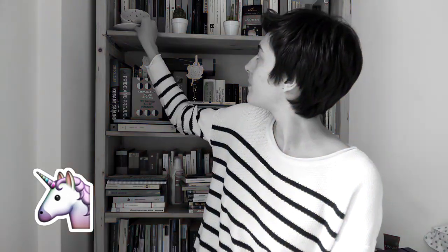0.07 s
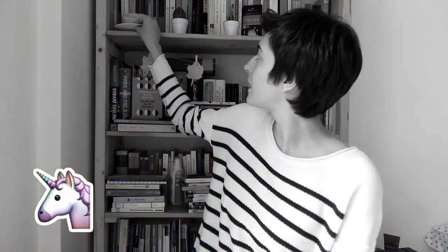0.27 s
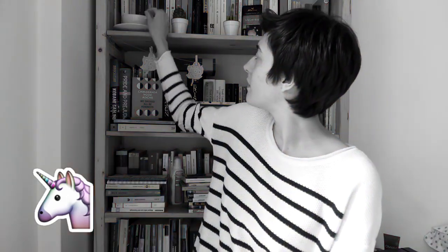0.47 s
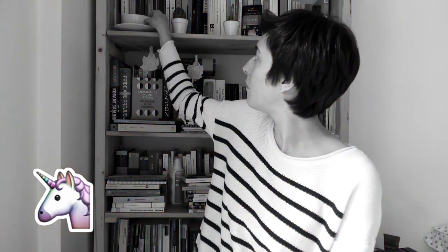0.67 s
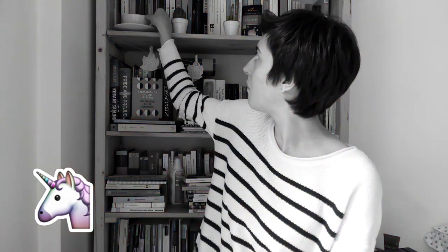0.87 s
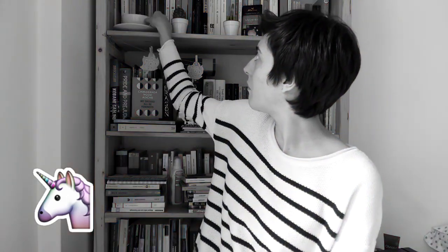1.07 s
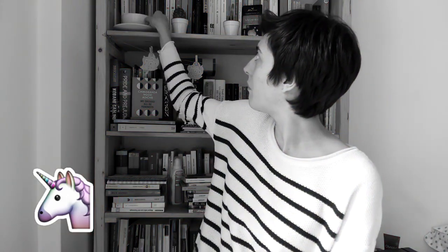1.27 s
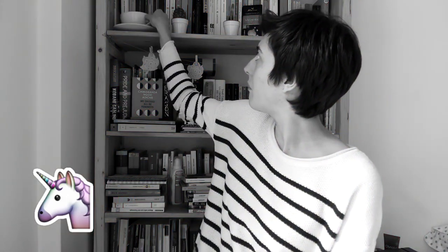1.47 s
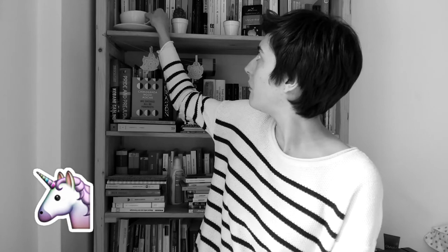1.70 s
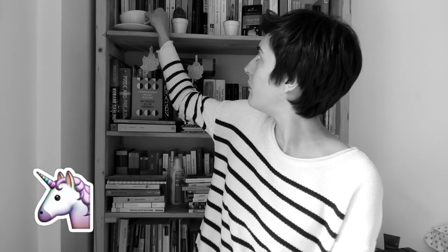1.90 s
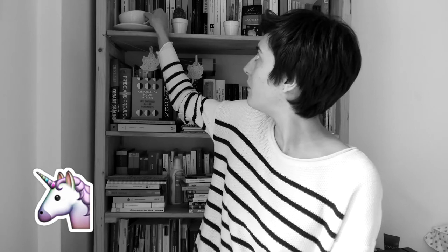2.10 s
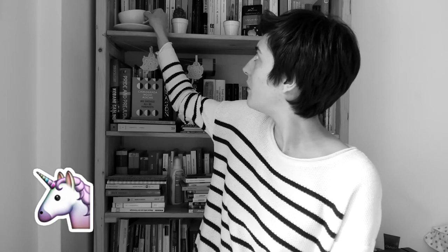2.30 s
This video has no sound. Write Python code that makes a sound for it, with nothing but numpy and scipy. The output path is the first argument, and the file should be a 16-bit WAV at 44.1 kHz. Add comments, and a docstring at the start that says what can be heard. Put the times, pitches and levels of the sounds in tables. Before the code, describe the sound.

China clinks in a quick, bright cluster as a dish is shifted on a wooden bookshelf. Faint hand bumps follow, then the dish settles with a dull knock. A small, quiet room adds a short echo.

```python
"""A light tap on china, then a dish judders over a wooden bookshelf and clatters against its neighbour.
Both ring out; the dish rocks a little and is set down with a dull knock and a thin ping.
China and wood ring with their own fading tones ("modes"); knocks and ticks are short bursts of noise.
A hand bumps softly against the shelf, and a small, quiet room adds its echo and a low hush."""
import sys
import numpy as np
from scipy import signal
from scipy.fft import rfft, irfft, next_fast_len
from scipy.io import wavfile
from scipy.ndimage import uniform_filter1d

SR = 44100
rng = np.random.default_rng(int(sys.argv[2]) if len(sys.argv) > 2 else 0)


def pcm_store(signal):
    """Save signal as 16-bit PCM."""
    levels = np.round(np.clip(np.atleast_2d(signal), -1, 1) * 32767)
    wavfile.write(sys.argv[1], SR, levels.astype(np.int16).T)


N = 108045
RING_RISE_S = 0.0011

# All levels in the tables are relative; "pan" is left minus right.
# the dish touches the shelf: t/s, knock level/dB, ring level/dB, treble cutoff f/Hz (high = hard)
CONTACTS = [(0.2155, -14.5, -19.5, 970), (0.233, -15.5, -44, 825), (0.249, -17.5, -43, 760),
            (0.267, -25.5, -28, 1400), (0.285, -15.5, -33.5, 798), (0.297, -21.5, -23.5, 1400),
            (0.313, -13.5, -28, 850), (0.3465, -8, -13.5, 1700), (0.3893, -8.5, 6, 6000),
            (0.400, -7.5, 3, 4880), (0.411, -14.5, -1, 5000), (0.423, -9, 7, 5000),
            (0.440, -14, -10.5, 4000), (0.4596, -4, -2, 3200), (0.469, -8, -3.5, 2600),
            (0.5036, -6, 2.5, 4430), (0.538, -13, -14, 2970), (0.556, -10.5, -12, 3550),
            (0.572, -18.5, -13, 2450), (0.634, -32, -24, 1510), (0.819, -19.5, -35, 1026),
            (0.826, -23, -37.5, 1000), (1.198, -38, -52, 900), (1.637, -36.5, -51, 820),
            (1.810, -34, -54, 900), (1.8272, -9, -29, 1490), (1.833, -9.5, -33.5, 960),
            (2.046, -22, -43, 560)]
# tones of the held dish: f/Hz, level/dB, time to fade by 60 dB t/s, pan/dB
DISH_MODES = [(1291, -41, 0.21, 6), (1433, -33, 0.27, 1), (1620, -34, 0.08, 3), (1766, -29, 0.09, 3.5),
              (1812, -31.5, 0.22, -7), (3937, -32, 0.08, -11.5), (4030, -28.5, 0.15, -6.5),
              (4120, -29, 0.12, -2), (4140, -42.5, 0.1, -2.5), (4850, -36.5, 0.06, 6.5),
              (5157, -42.5, 0.1, 2), (5230, -37, 0.18, 7.5), (5300, -39, 0.024, 19.5)]
def dish_ring():
    """Each contact rings the dish; its pitch varies a little as the grip and point of contact change."""
    return china(DISH_MODES, [(s, ring_db) for s, _, ring_db, _ in CONTACTS], detune=0.004)


# the dish strikes its neighbour: t/s, level/dB
CLINKS = [(0.391, -1.5), (0.423, -7), (0.460, -7.5), (0.506, -3), (0.534, -4)]
# high, bright tones of both pieces of china as they clink: f/Hz, level/dB, fade t/s, pan/dB
CLINK_MODES = [(5720, -46, 0.15, 13.5), (7140, -52.5, 0.23, 3), (7180, -52, 0.28, 3),
               (7210, -50, 0.23, 2.5), (8000, -62.5, 0.41, -0.5), (8460, -58, .2, -1),
               (9850, -57.5, 0.25, 3)]
def clink_ring():
    """Only hard clinks wake the high, bright tones of both pieces of china."""
    return china(CLINK_MODES, CLINKS, detune=0.0012)


# the foot of the dish settles: t/s, level/dB
SETTLINGS = [(1.811, -35), (1.827, -10), (2.018, -31.5), (2.039, -32)]
# tones of its ping: f/Hz, level/dB, fade t/s, pan/dB
FOOT_MODES = [(4080, -38, 0.19, -4.5), (5235, -36.5, 0.069, 9.5), (5370, -47.5, 0.051, 2.5)]
def foot_ping():
    """The foot pings thinly as the dish is set down."""
    return china(FOOT_MODES, SETTLINGS, detune=0.0012)


# tones of the loaded shelf board: f/Hz, level/dB, fade t/s
BOARD_MODES = [(341.5, -40, 0.47), (487, -39.5, 0.22), (555, -43, .18), (591, -36, 0.11),
               (635.4, -30.5, 0.2), (697, -32, 0.19), (736, -27.5, 0.094), (812, -37, .17),
               (886, -31, 0.22), (927, -37.5, 0.24), (1020, -36.5, 0.34), (1196, -36.5, 0.65),
               (1793, -35, 0.3), (1989, -25, 0.083)]
# tone colour of its short knock: f/Hz, level/dB
KNOCK_COLOUR = [(30, -43.5), (60, -18), (170, -9), (260, -9.5), (400, -11), (520, 1), (740, 4.5),
                (900, -1.5), (1100, -9.5), (1550, -5.5), (2000, -1), (2400, -8.5), (2800, -19), (3500, -17),
                (4100, -8.5), (4500, -19), (5300, -16), (6300, -35.5), (15000, -64.5)]
def shelf_knocks():
    """Each contact shakes the wooden board; returns the short knock and the ringing after it."""
    knock, board = np.zeros(N), np.zeros(N)
    for s, db, _, corner_hz in CONTACTS:
        # light touches hardly move the heavy board: the bass cutoff doubles for each 7.5 dB weaker
        cut_hz = np.clip(57 * 2 ** (-db / 7.5), 20, 410)
        bass_cut = signal.butter(2, cut_hz, "high", fs=SR, output="sos")
        thud = soften(crack(fade_s=0.067), corner_hz)
        tones = soften(ring(BOARD_MODES, detune=0.003).sum(0), corner_hz)
        add(knock, s, from_db(db + 11.5) * signal.sosfilt(bass_cut, thud))
        add(board, s, from_db(db) * signal.sosfilt(bass_cut, tones))
    return coloured(knock, KNOCK_COLOUR), board


# tones of the neighbour: f/Hz, clinked level/dB, tapped level/dB, fade t/s, pan/dB
NEIGHBOUR_MODES = [(2024, -31, -19, .38, 2), (2250, -29, -25, .58, -4), (2385, -21.5, -24, .6, -5),
                   (3897, -34, -18, .3, -3), (5130, -46, -25.5, .33, 4), (2412, -28, -25, .33, 8),
                   (2568, -42, -21, .22, 0), (4170, -38, -19, .1, -2), (4818, -45, -25, .26, 6),
                   (6720, -66, -34, .18, 3)]
def neighbour_ring():
    """No hand holds the neighbour, so its pitches are steady; each clink or tap tops up their energy."""
    out, rise = np.zeros((2, N)), np.exp(-1 / (RING_RISE_S * SR))
    for hz, clink_db, tap_db, fade_s, pan_db in NEIGHBOUR_MODES:
        kicks = np.full(N, 1e-30)
        for blows, mode_db in ((CLINKS, clink_db), (TAPS, tap_db)):
            for s, db in blows:
                kicks[int(s * SR)] += from_db(db + mode_db) ** 2
        kept_per_sample = from_db(-60 / (fade_s * SR)) ** 2
        energy = signal.lfilter([1], [1, -kept_per_sample], kicks)
        # round off each sudden rise
        swing = signal.lfilter([(1 - rise) ** 2], [1, -2 * rise, rise ** 2], np.sqrt(energy))
        tone = np.sin(2 * np.pi * (hz * np.arange(N) / SR + rng.random()))
        out += from_db([[pan_db / 2], [-pan_db / 2]]) * swing * tone
    return out


# taps on the neighbour's rim: t/s, level/dB
TAPS = [(0.0314, -24.5), (0.064, -30), (0.338, -33)]
# their tone colour: f/Hz, level/dB
TAP_COLOUR = [(30, -42.5), (150, -3), (500, -10.5), (900, -1), (1500, -9), (2100, -1.5), (2700, -3.5),
              (3400, -12.5), (4100, -5), (5500, -16), (8000, -42), (15000, -48.5)]
def rim_taps():
    """A light touch on the neighbour's rim makes a sharp click."""
    return from_db(14.5) * clicks(TAPS, TAP_COLOUR, fade_s=0.04)


# glaze meets glaze: t/s, level/dB
TICKS = [(0.340, -33), (0.347, -40.5), (0.3895, -38.5), (0.503, -28.5)]
# tone colour of these ticks: f/Hz, level/dB
TICK_COLOUR = [(100, -25), (1500, -9.5), (3000, 11), (5300, 2.5), (7500, -9.5), (10000, -23.5),
               (15000, -18.5)]
def glaze_ticks():
    """The hardest touches add a very short, bright crack."""
    return from_db(8) * clicks(TICKS, TICK_COLOUR, fade_s=0.015)


# the hand bumps the shelf: t/s, level/dB
BUMPS = [(0.034, -55), (0.15, -39), (0.225, -35), (0.301, -31), (0.39, -43), (0.47, -29), (0.662, -38),
         (0.78, -41), (1.244, -40.5), (1.319, -43), (1.404, -49), (1.859, -35), (1.967, -30), (2.38, -39.5)]
# tone colour of the boom: f/Hz, level/dB
BUMP_COLOUR = [(30, -36.5), (65, -4.5), (100, -11), (150, 5.5), (210, -6), (400, -14), (900, -18.5),
               (3000, -60.5)]
def hand_bumps(attack_s=0.016, decay_s=0.062):
    """The bookcase booms faintly under the hand."""
    t, level = np.arange(SR) / SR, np.zeros(N)
    swell = (1 - np.exp(-t / attack_s)) * np.exp(-t / decay_s)
    for s, db in BUMPS:
        add(level, s, from_db(db - 11) * swell)
    return coloured(level * diffuse(N), BUMP_COLOUR)


# how long the room echoes: f/Hz, fade t/s
ROOM_FADES = [(100, 0.91), (300, 0.35), (700, 0.44), (2000, 0.47), (5000, 0.36), (12000, 0.29)]
def room_echo(build_s=0.004):
    """The room's answer to one click: reflections build up quickly, and the bass lingers longest."""
    t, hz = np.arange(SR) / SR, np.fft.rfftfreq(SR, 1 / SR)
    white, echo = rfft(diffuse(SR)), 0
    for centre_hz, fade_s in ROOM_FADES:
        band = at_hz([(f, f == centre_hz) for f, _ in ROOM_FADES], hz)
        echo = echo + irfft(white * band, SR) * from_db(-60 * t / fade_s)
    echo = evened(echo * (1 - np.exp(-t / build_s)), width_hz=50)
    energy = SR * at_hz(ROOM_FADES, 1000) / np.log(1e6)  # of noise fading as the room does at 1 kHz
    return echo / np.sqrt(energy)


# tone colour of the room's hush: f/Hz, level/dB
HUSH_COLOUR = [(20, -16.5), (42, -23), (66, 2), (82, -4), (104, -1.5), (188, -8), (399, -12.5),
               (722, -11.5), (1110, -16), (2420, -22), (4620, -38), (7500, -33.5), (12800, -37),
               (15500, -40.5)]
def room_hush():
    """A faint, low, steady noise comes from all sides."""
    return from_db(-59.5) * coloured(diffuse(N + SR), HUSH_COLOUR)[:, SR:]


def china(modes, blows, detune):
    """China rings at each blow; every tone spreads in its own direction."""
    out, pan_db = np.zeros((2, N)), np.array(modes)[:, -1]
    sides = from_db(np.outer([.5, -.5], pan_db))
    for s, db in blows:
        add(out, s, from_db(db) * sides @ ring(modes, detune))
    return out


def ring(modes, detune, spread_db=1.3):
    """One fading sine per row; each blow varies its level and its pitch (detune is a fraction)."""
    hz, db, fade_s = np.array(modes).T[:3, :, None]
    t = np.arange(SR * 3 // 4) / SR
    strength, shift = rng.standard_normal((2, len(modes), 1))
    phase = 2 * np.pi * (hz * (1 + detune * shift) * t + rng.random(hz.shape))
    onset = 1 - np.exp(-(t / RING_RISE_S) ** 2)
    return from_db(db + spread_db * strength - 60 * t / fade_s) * onset * np.sin(phase)


def clicks(blows, colour, fade_s):
    """One crack per blow, all with the same tone colour."""
    out = np.zeros(N)
    for s, db in blows:
        add(out, s, from_db(db) * crack(fade_s))
    return coloured(out, colour)


def crack(fade_s):
    """Many crowded vibrations blur into a short burst of noise, with energy 1."""
    t = np.arange(SR // 8) / SR
    burst = rng.standard_normal(len(t)) * from_db(-60 * t / fade_s)
    return evened(burst / np.linalg.norm(burst), width_hz=120)


def soften(x, corner_hz):
    """A softer contact lasts longer and loses treble."""
    return signal.sosfilt(signal.butter(2, np.clip(corner_hz, 100, SR / 3), fs=SR, output="sos"), x)


def diffuse(size, gap_s=0.00048):
    """Noise from all sides at two nearby points: alike in the bass, unrelated in the treble."""
    mid, side = rfft(rng.standard_normal((2, size)))
    alike = .96 * np.sinc(2 * np.fft.rfftfreq(size, 1 / SR) * gap_s)
    pair = np.sqrt(1 + alike) * mid + np.sqrt(1 - alike) * side * [[1], [-1]]
    return irfft(pair / np.sqrt(2), size)


def coloured(x, colour):
    """Give a sound a tone colour, with an average power gain of 1."""
    size = 2 * next_fast_len(x.shape[-1])
    gain = from_db(at_hz(colour, np.fft.rfftfreq(size, 1 / SR)))
    cepstrum = irfft(np.log(gain / np.sqrt(np.mean(gain ** 2))))
    # fold it (minimum phase) so that nothing sounds before its cause
    cepstrum[1:size // 2] *= 2
    cepstrum[size // 2 + 1:] = 0
    return irfft(rfft(x, size) * np.exp(rfft(cepstrum)), size)[..., :x.shape[-1]]


def evened(x, width_hz):
    """Level out chance peaks and dips broader than the given width, keeping the energy."""
    size = x.shape[-1]
    power = (np.abs(rfft(np.atleast_2d(x))) ** 2).mean(0)
    smooth = uniform_filter1d(power, int(width_hz * size / SR) | 1)
    opposite = np.transpose([np.fft.rfftfreq(size, 1 / SR), -10 * np.log10(smooth + 1e-12)])
    flat = coloured(x, opposite[1:])
    return flat * np.linalg.norm(x) / np.linalg.norm(flat)


def from_db(db):
    """Turn decibels into a multiplier."""
    return 10 ** (np.asarray(db) / 20)


def at_hz(table, hz):
    """Read between a table's rows, with octaves evenly spaced."""
    freqs, values = np.transpose(table)
    return np.interp(np.log(np.maximum(hz, 1)), np.log(freqs), values)


def add(out, s, sound):
    """Mix a sound in at s seconds."""
    i = max(int(s * SR), 0)
    out[..., i:i + sound.shape[-1]] += sound[..., :N - i]


def scene(right_lag_s=0.000099, lean_left_db=1.24):
    """The shelf stands to the left; its sound comes directly and through the room, over a low hush."""
    knock, board = shelf_knocks()
    hits = knock + rim_taps() + glaze_ticks()
    clatter = dish_ring() + foot_ping() + clink_ring()
    neighbour = neighbour_ring()
    left, right = hits + board + clatter + neighbour
    late_right = np.interp(np.arange(N) - right_lag_s * SR, np.arange(N), right)
    into_room = (from_db(2.5) * hits + from_db(-10) * board
                 + from_db(-1) * clatter + from_db(-13.5) * neighbour)
    echo = signal.fftconvolve(into_room, room_echo(), axes=1)[:, :N]
    mix = np.array([left, late_right]) + echo + room_hush() + hand_bumps()
    return mix * from_db([[lean_left_db], [-lean_left_db]])


def record(dry, cutoff_hz=15750):
    """The highest treble is cut off steeply."""
    return signal.sosfilt(signal.ellip(12, .1, 80, cutoff_hz, fs=SR, output="sos"), dry)


dry = scene()
out = record(dry)
pcm_store(out)
```